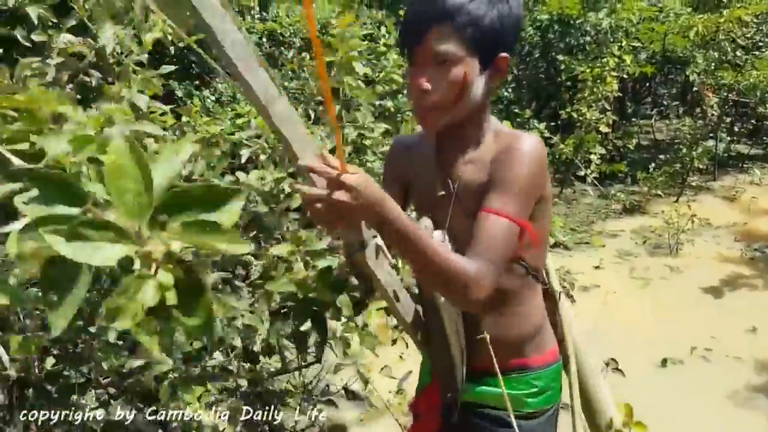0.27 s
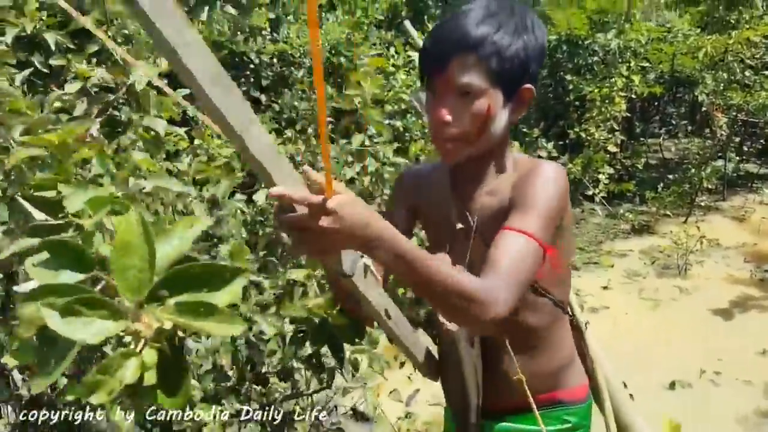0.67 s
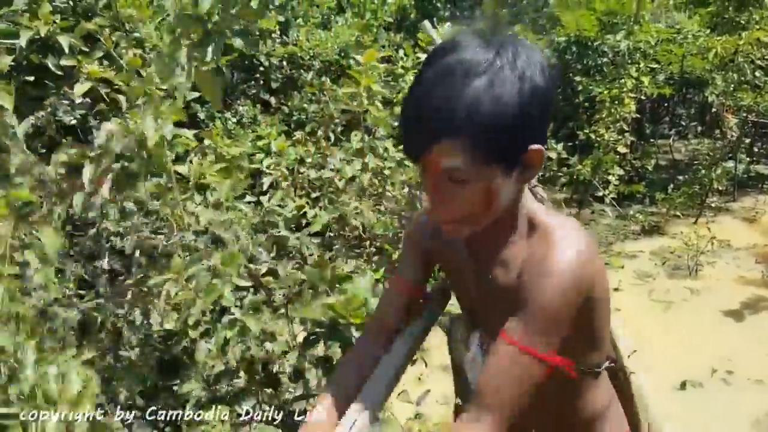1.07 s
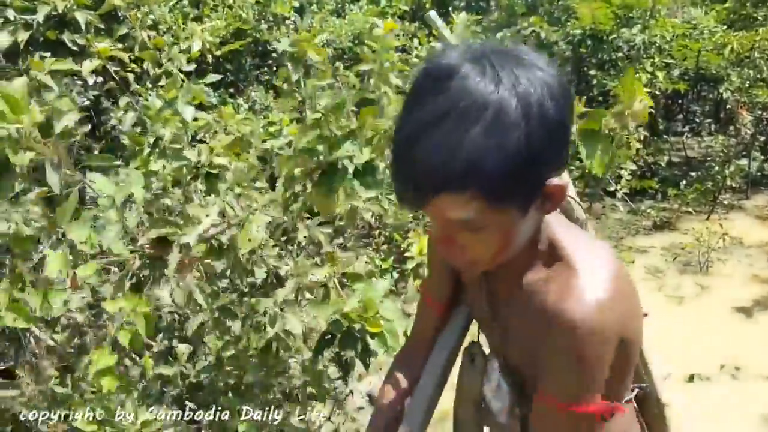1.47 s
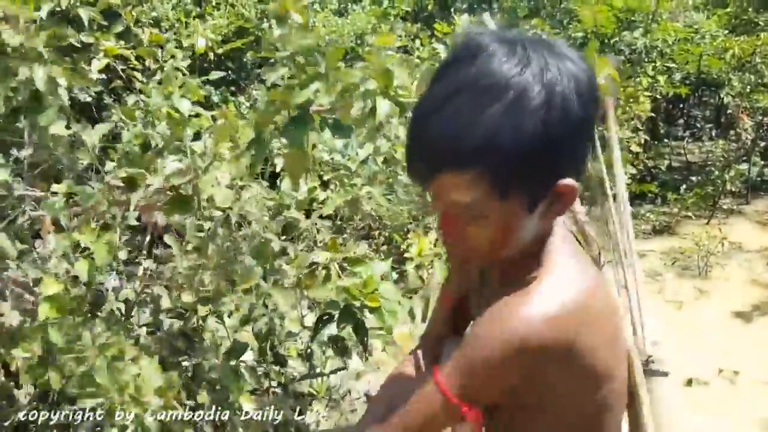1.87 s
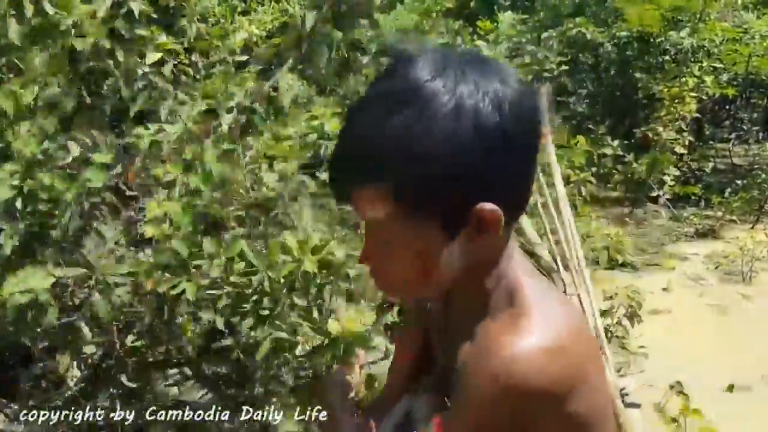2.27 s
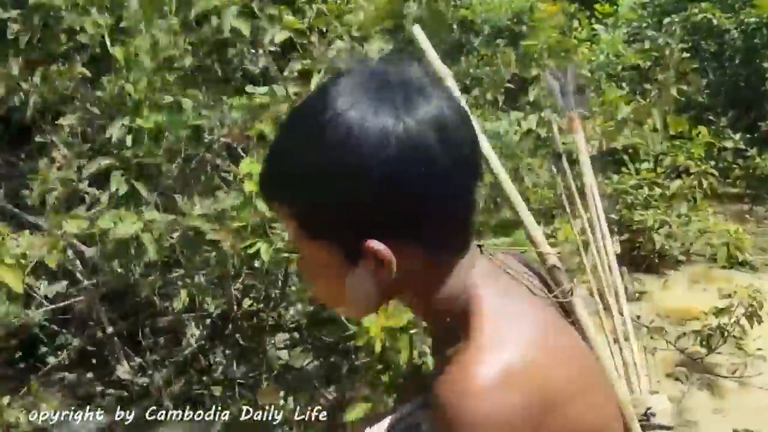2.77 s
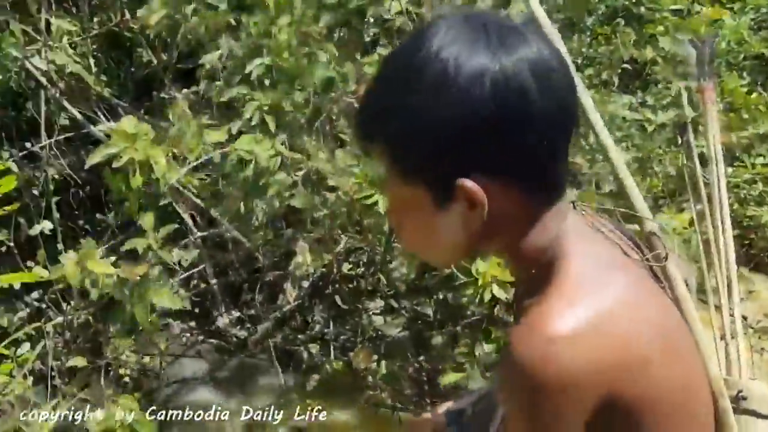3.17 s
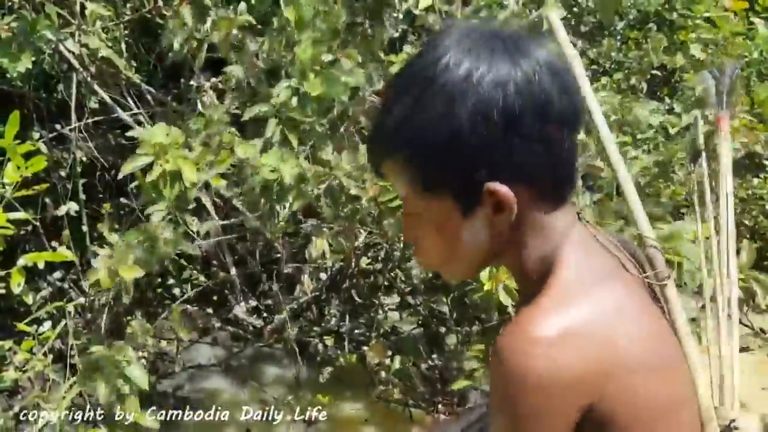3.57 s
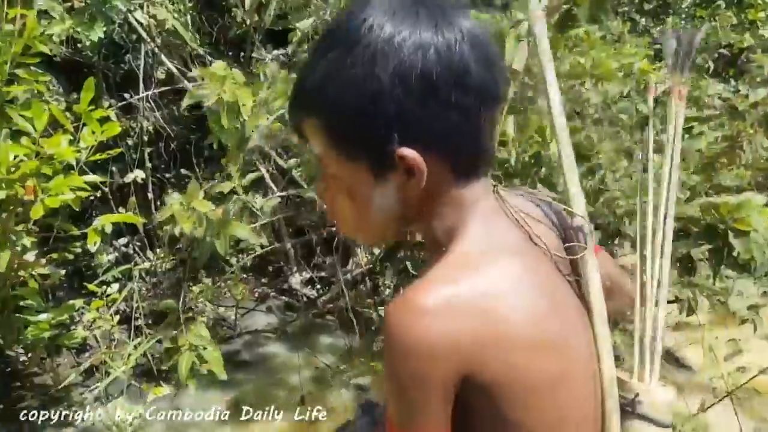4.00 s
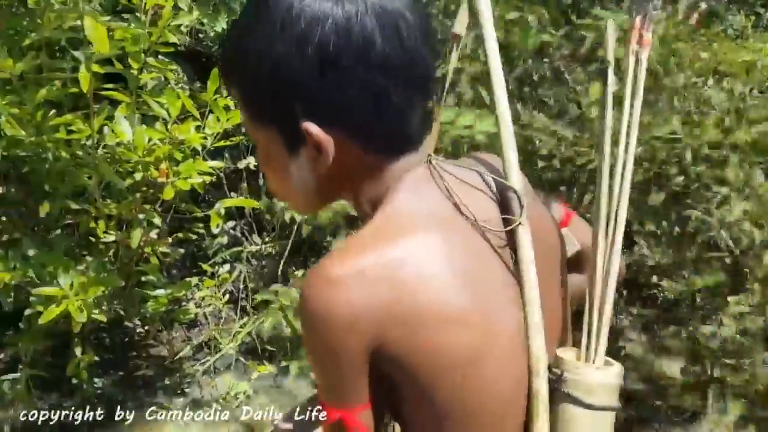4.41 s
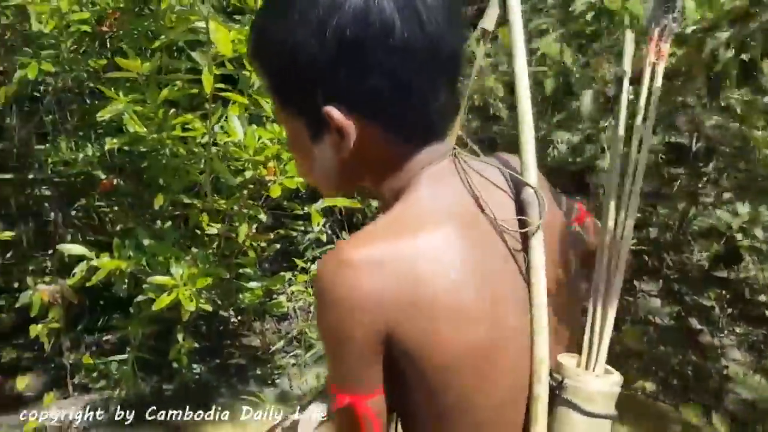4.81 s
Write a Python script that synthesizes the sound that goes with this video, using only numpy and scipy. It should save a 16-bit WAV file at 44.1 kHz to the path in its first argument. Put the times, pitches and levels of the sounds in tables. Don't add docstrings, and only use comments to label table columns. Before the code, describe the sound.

Outdoors in leafy brush, someone wades slowly through shallow muddy water. Bubbles pop and gurgle close to a stereo microphone, with sharper plops around two and four seconds. Leaves scrape, twigs tick, and a small bird repeats a fast falling song about every second, lightly echoed by trees, over quiet rumble and hiss.

```python
import sys
import numpy as np
from scipy import signal
from scipy.io import wavfile
from scipy.ndimage import uniform_filter1d

SR = 44100
rng = np.random.default_rng(int(sys.argv[2]) if len(sys.argv) > 2 else 0)


def wrap_up_sound(samples):
    columns = np.atleast_2d(samples).T
    tamed = np.clip(columns, -1, 1)
    steps = np.round(tamed * 32767).astype(np.int16)
    wavfile.write(sys.argv[1], SR, steps)


def volts(x):
    e = np.asarray(x, float) / 20
    return 10 ** e


N = 222660

# full force from t/s, hold/s, gurgle level/dB, time to swell by 10 dB/s, usual bubble f/Hz
PUSHES = [(.539, 0.026, -60, 0.12, 1215), (.654, 0.011, -54, 0.06, 1514), (.838, 0.2, -50, 0.14, 1315),
          (1.33, 0.018, -54.5, 0.22, 1467), (1.601, 0.14, -54, -0.08, 1135),
          (1.74, 0.022, -52.5, -0.04, 1610), (1.866, 0.12, -46, 0.1, 1783), (2.02, 0.16, -45.5, 0.12, 1320),
          (2.33, 0.13, -61, -0.7, 1370), (2.554, 0.0013, -50, -0.07, 1260), (2.76, 0.026, -49, -0.28, 1460),
          (3.013, 0.16, -59, 0.1, 1747), (3.2, 0.42, -60, -0.5, 1542), (3.497, 0.00083, -45, -0.0238, 1830),
          (3.65, 0.13, -53, 0.09, 1320), (3.83, 0.12, -47, 0.13, 1164), (4.1, 0.012, -57.5, 0.26, 1670),
          (4.2, 0.074, -59.5, 0.1, 1787), (4.51, .001, -58, 0.1, 1535), (4.909, 0.068, -53.5, 0.06, 1110),
          (5.03, .05, -51, 0.1, 1153)]
PUSH_EBB = 0.85


def water():
    # t/s, delay/samples
    water_lag = [
        (0, 3.3),
        (3.0, 3.2),
        (3.9, 0.067),
        (4.2, 3.3),
        (5.05, 4.7),
    ]
    near = pockets_of_air() + gurgle(spread_octaves=1.593, size_db=6.0, cycles=36.0)
    near = near + wash(226, 810, wash_db=-16.0) + wash(1790, 2500, wash_db=-10.0)
    near = near + wash(3500, 6200, wash_db=-16.5)
    lag, = in_time(water_lag)
    late = np.interp(np.arange(N) - lag, np.arange(N), near)
    return np.array([late, near]) + volts(-14) * scatter(near, t60=0.08, cut_hz=10000)


def pockets_of_air():
    # t/s,
    # peak level/dB, f/Hz, ring cycles to -60 dB
    slaps = [(.8226, -26, 1115, 8), (1.8693, -30, 615, 9.5), (2.0841, -11.5, 1930, 4.5),
             (2.1214, -23.5, 704, 7.5), (2.1676, -28, 1700, 21), (2.1925, -19.5, 760, 4.5),
             (2.5372, -11.5, 1080, 5.5), (2.5415, -28, 2130, 11), (2.5603, -23.5, 1740, 8),
             (2.7711, -20, 1390, 11), (2.7715, -25.5, 2084, 19), (2.7822, -23.5, 1600, 9),
             (2.7892, -34, 1150, 22), (2.7745, -33, 1200, 14), (2.7772, -34, 1180, 13),
             (2.7945, -39, 1200, 14), (2.838, -39, 415, 3.5), (3.9331, -21.5, 5500, 20),
             (3.9361, -28, 5230, 17), (1.9065, -25, 2510, 21), (.952, -40, 2450, 25), (.996, -40, 2300, 20),
             (1.015, -41, 2330, 20), (.922, -42, 2600, 25), (.98, -43, 2520, 20), (3.295, -44, 2250, 25),
             (3.10, -46, 3100, 25), (2.838, -44, 1500, 6), (3.0136, -28, 738, 4.5), (3.5104, -25, 1300, 12),
             (3.7192, -29.5, 1290, 11), (3.8782, -13.5, 1765, 16.5), (3.8839, -25.5, 653, 26),
             (3.9067, -31.5, 860, 15), (3.9451, -28, 774, 12), (4.246, -26.5, 1980, 31.5),
             (4.9293, -28, 794, 18), (4.9298, -26.5, 1570, 10.5), (5.0294, -26.5, 2030, 22),
             (4.9121, -27, 1110, 4), (2.1515, -32, 894, 2), (3.8795, -35, 2440, 16)]
    # t/s, peak level/dB, start f/Hz, ring cycles to -60 dB
    shooting = [(.5381, -25, 682, 18), (.5385, -35.5, 1600, 35), (.551, -49, 1010, 54.5),
                (.8736, -28, 1135, 27), (1.0548, -35, 544, 33.5), (1.5796, -28.5, 491, 15),
                (1.5833, -27.5, 634, 31), (1.6188, -34.5, 984, 38), (1.6281, -31, 1023, 16.5),
                (1.8433, -29, 2255, 41), (1.8747, -33.5, 1166, 33), (1.9061, -22, 1930, 8),
                (1.9376, -27, 1630, 24), (1.9466, -33.5, 915, 56), (2.0091, -33.5, 1190, 48),
                (2.5387, -32.5, 966, 48), (3.0205, -36, 1020, 29), (3.1503, -41, 1690, 42),
                (3.4751, -21, 1920, 16), (3.8856, -25.5, 1730, 29), (4.2524, -20.5, 920, 8.5),
                (4.9785, -40.5, 624, 48)]
    # t/s, peak level/dB, start f/Hz
    drifting = [(.5416, -28, 1037), (.7957, -37, 1810), (1.0585, -32, 1260), (1.0855, -29, 2254),
                (1.857, -36.5, 2107), (1.939, -35.5, 1170), (2.0621, -32.5, 1450), (2.1473, -37, 770),
                (3.4983, -31.5, 1820), (3.6317, -32, 1980), (3.7367, -34, 1203), (3.7873, -38, 455),
                (3.8118, -36.5, 1410), (4.0122, -36, 1120), (4.898, -33, 1417), (4.9121, -28.5, 1210),
                (1.717, -41.5, 1830), (1.747, -37.5, 2140), (1.995, -41, 1490), (2.206, -42, 1620),
                (2.225, -45.5, 1730)]
    # t/s, peak level/dB, f/Hz
    held = [(.7991, -43, 515), (.8134, -35.5, 1420), (.8537, -41, 1270), (.8663, -37.5, 1220),
            (1.0543, -31, 786), (1.9525, -32, 1132), (1.9605, -32.5, 2300), (2.0805, -25, 1295),
            (2.1512, -36, 523), (2.1824, -35, 1360), (3.5121, -28.5, 1987), (4.0847, -37, 556),
            (4.2456, -23, 1188), (4.8862, -32.5, 684), (4.8972, -45, 664), (4.9532, -39, 1856),
            (5.0175, -33, 2090), (5.0257, -38.5, 595), (2.7705, -34, 1077), (3.822, -44.5, 429),
            (2.1007, -43, 546), (1.012, -49, 585), (1.005, -46, 1002), (1.855, -44, 414)]
    # t/s, peak level/dB, start f/Hz
    drips = [(.254, -48.5, 515), (.315, -46.5, 1800), (.466, -45, 1590), (.498, -44, 1200),
             (.66, -41, 1330), (.741, -42.5, 740), (.768, -40.5, 710), (1.0553, -34.5, 1085),
             (1.193, -47, 800), (1.473, -49, 886), (1.693, -40, 1390), (1.784, -38.5, 2220),
             (2.0169, -30.5, 1210), (2.297, -51, 1070), (3.078, -39.5, 1975), (3.1575, -35, 1510),
             (3.219, -46.5, 744), (3.252, -45.5, 658), (3.297, -41, 2180), (3.333, -47, 980),
             (3.4353, -33.5, 1440), (3.5244, -27.5, 1590), (3.565, -41, 670), (4.148, -45.5, 728),
             (4.173, -44, 1650), (4.323, -52, 2450), (4.85, -36.5, 2040), (5.0042, -35, 1120),
             (.395, -57, 1750), (.42, -50, 1800), (.612, -47, 870), (.637, -39, 1510), (.776, -42, 605),
             (.922, -43, 1300), (.956, -46, 1830), (.974, -39.5, 380), (.996, -47, 575),
             (1.268, -39.5, 2240), (1.359, -41, 2160), (3.085, -46, 900), (3.104, -50, 730),
             (3.133, -46, 1390), (3.187, -45, 1220), (3.19, -46, 2230), (3.358, -46, 1280),
             (3.37, -42.5, 1790), (3.575, -45, 630), (3.62, -38.5, 1010), (3.751, -34.5, 2130),
             (3.751, -34, 1390), (3.78, -38.5, 1890), (3.929, -31.5, 2140), (3.975, -34.5, 1650),
             (3.985, -40, 1750), (4.038, -44, 2210), (4.056, -40.5, 810), (4.065, -40, 1823),
             (4.082, -39.5, 1624), (2.128, -31, 2450)]
    # t/s, peak level/dB, start f/Hz
    gulps = [(.5554, -35.5, 373), (.8783, -36, 368), (.923, -40, 346), (.957, -43.5, 365),
             (1.017, -47, 520), (1.605, -42, 497), (1.835, -39, 470), (2.534, -39, 516), (3.013, -45, 339),
             (3.5244, -35.5, 903), (3.94, -38, 528), (3.973, -41, 510), (4.243, -47, 322),
             (4.945, -44.5, 315.2), (5.023, -44, 570), (2.224, -41.5, 586), (2.263, -47, 626),
             (3.666, -46, 596), (3.685, -44, 685), (3.731, -37, 660), (3.769, -43, 695), (3.645, -47, 664),
             (3.696, -41, 750), (3.709, -45, 690), (3.867, -39, 600), (3.744, -42, 694), (3.787, -37, 1020),
             (3.839, -45, 1158), (3.719, -36, 2050), (.909, -49, 780), (.928, -46, 886), (1.962, -45, 600),
             (4.011, -42, 630)]
    pockets = kind(slaps, .077) + kind(shooting, 1.136)
    pockets += kind(drifting, 48.6, .4) + kind(held, 48.6, .097)
    pockets += kind(drips, 27, .23) + kind(gulps, 23.7, .23)
    return bubbles(pockets, length_s=.07)


def kind(rows, *shared):
    return [(*row, *shared) for row in rows]


def bubbles(rows, length_s):
    s, db, hz, cycles, rise = np.transpose(rows)[:, :, None]
    t = np.arange(int(length_s * SR)) / SR
    life = np.maximum(cycles, 4) / hz
    swell = 1 - np.exp(-1.5 * hz * t)
    tone = np.sin(2 * np.pi * hz * (t + rise * t * t / life / 2))
    return place(s[:, 0], swell * volts(db - 60 * t / life) * tone)


def gurgle(spread_octaves, size_db, cycles):
    level_db, centre_hz = efforts(PUSHES, PUSH_EBB)
    when, pitch, other, size, life, rise = rng.random((5500, 6)).T
    octaves = spread_octaves * (pitch + other - .95)
    hz = centre_hz[(when * N).astype(int)] * 2 ** octaves
    hz = np.where(hz > 2700, hz / 2, np.maximum(hz, 300))
    db = -size_db * np.log(size + .06)
    rings = bubbles(np.c_[when * N / SR, db, hz, cycles * (.3 + life), .7 * rise], length_s=.03)
    return volts(level_db - 3.5) * rms_one(rings)


def wash(low_hz, high_hz, wash_db):
    push_db, _ = efforts(PUSHES, PUSH_EBB)
    level_db = push_db + wash_db + 4.1 * drift(26)
    band = signal.butter(2, [low_hz, high_hz], "band", fs=SR, output="sos")
    return volts(level_db) * rms_one(signal.sosfilt(band, rng.standard_normal(N)))


def brush(grain_db, grains_per_s):
    # full force from t/s, hold/s, rustle level/dB, time to swell by 10 dB/s,
    # extra level below 4 kHz/dB
    strokes = [(0, 0.018, -64, 0.45, 5), (.177, .001, -62.5, 0.08, -4), (.5, .13, -76.5, -2, 8),
               (.67, 0.15, -61.5, 0.06, 8.5), (.955, .001, -54.5, 0.08, 3), (1.05, 0.34, -63, 0.32, -1),
               (1.33, 0.024, -55, 0.23, 2), (1.738, 0.0012, -52, 0.2, 7), (1.845, 0.02, -52, 0.02, 5),
               (1.93, 0.19, -48, 0.025, -12), (2.16, 0.012, -51, 0.1959, -17), (2.42, 0.19, -63, 0.1, 10),
               (2.85, 0.29, -64.5, 0.14, 8.5), (3.08, 0.0014, -51.5, -0.06, 1),
               (3.344, 0.0011, -65.5, 0.45, 3.5), (3.434, 0.0024, -52.5, -0.03, 9.5),
               (3.47, .012, -53, 0.012, 5), (3.514, .001, -50.5, 0.04, 8), (3.6, .03, -58, .04, 3),
               (3.93, .03, -57, .04, 3), (3.748, 0.24, -58.5, 0.05, 4), (4.04, 0.059, -63.5, -0.67, 16),
               (4.282, .001, -57, -0.23, 7), (4.37, 0.016, -60.5, 0.5, -4), (4.482, 0.071, -54, 0.02, -6),
               (4.82, 0.27, -70.5, -0.3, 2), (5.049, 0.00086, -52, 0.04, 8)]
    # f/Hz, level per Hz/dB
    leaf_colour = [(500, -15), (1200, -7), (2500, -5), (4700, -1), (7000, -5.5), (10000, -7), (13000, -7),
                   (15800, -7.5)]
    level_db, body_db = efforts(strokes, ebb=1)
    hits = rng.random(N) < grains_per_s / SR
    grains = hits * volts(grain_db * np.minimum(rng.exponential(1, N), 3))
    roughness = 1 + 0.35 * signal.lfilter([1], [1, -.97], grains)
    rustle = banded(rng.standard_normal((2, 2, N)) * roughness, leaf_colour, patchy_db=2.0)
    body = signal.sosfilt(signal.butter(2, 4000, fs=SR, output="sos"), rustle)
    return volts(level_db + 3.0 + 2.0 * drift(31)) * (rustle + (volts(body_db) - 1) * body)


def ticks(crack_db):
    # t/s, peak level/dB, f/Hz
    snaps = [(.6619, -43.5, 8750), (0.7344, -34, 8400), (.8225, -36, 13200), (0.9475, -35.5, 10700),
             (0.9968, -41, 5120), (1.8408, -31.5, 5130), (1.923, -32, 5650), (1.9589, -34.5, 9900),
             (2.1214, -47, 9750), (3.073, -46, 9700), (3.336, -43, 5400), (3.4321, -46, 9600),
             (3.465, -37, 8600), (3.502, -36.5, 9450), (3.789, -44.5, 9700), (3.8845, -42, 5300),
             (3.933, -37, 9050), (4.148, -48.5, 11100), (4.4726, -58, 8900), (5.014, -49, 9550),
             (5.0255, -46, 13800), (.1665, -40, 9800), (.6424, -61, 8630), (.6913, -43, 8100),
             (.7193, -51, 7700), (.7587, -45, 8600), (.883, -44, 5300), (1.044, -51, 10200),
             (1.1503, -56.5, 5600), (1.249, -34, 5060), (2.1211, -37, 5110), (2.152, -32, 4960),
             (2.7701, -49.5, 5840), (3.4321, -41.5, 5170), (3.5523, -44, 5370), (3.6062, -39.5, 5700),
             (3.6287, -50, 5270), (3.7404, -55, 5100), (4.246, -48, 5460), (4.4792, -45.5, 9300),
             (4.9631, -42.5, 5700), (5.0295, -30.5, 4800), (.9545, -51, 6000), (1.002, -40.5, 9500),
             (3.329, -57, 7000), (3.361, -49, 7450), (3.471, -36, 5800), (3.513, -45, 10300),
             (3.519, -45, 10000), (3.554, -40, 14400), (3.669, -47, 14300), (3.817, -51, 11600),
             (3.917, -46, 9400), (1.361, -41, 3200), (1.938, -43, 5450), (3.884, -41, 9560)]
    ring_s, attack_s = 0.017, 0.00062
    s, db, hz = np.transpose(snaps)[:, :, None]
    t = np.arange(1500) / SR
    flutter, crack = rng.standard_normal((2, 2, len(snaps), len(t)))
    ring = np.sin(2 * np.pi * hz * t) * rms_one(uniform_filter1d(flutter, size=24))
    fade = volts(db - 2.7 * (hz > 8000) - 60 * t / ring_s) * np.minimum(t / attack_s, 1)
    puffs = fade * (ring + volts(crack_db) * np.gradient(crack, axis=-1))
    return np.array([place(s[:, 0], side) for side in puffs])


def bird(change, buzz_hz, echo_db):
    # t from its start/s, length/s, start f/Hz, end f/Hz, level/dB
    song_notes = [(.002, 0.04, 5700, 4950, -12), (0.040, 0.03, 3960, 4100, -6),
                  (0.178, 0.034, 5040, 4100, -9.5), (0.253, 0.0081, 4850, 4670, -9),
                  (0.273, 0.0066, 4930, 4120, -6.5), (0.29, 0.015, 4100, 4060, -10.5),
                  (0.316, 0.012, 4150, 3380, -6.5), (0.359, 0.0063, 4270, 4720, 2),
                  (0.392, 0.012, 4660, 3460, -1.5), (0.405, 0.013, 4030, 3280, -7),
                  (0.446, 0.02, 3280, 3750, -10), (0.478, 0.03, 4150, 3100, -3),
                  (0.521, 0.047, 2585, 3730, -5.5), (0.558, 0.016, 4260, 3400, -9),
                  (0.573, 0.014, 2644, 3300, -6), (0.582, 0.015, 3400, 2700, -3),
                  (0.607, 0.043, 2445, 3900, -4), (0.64, 0.016, 4440, 4330, -9.5),
                  (0.654, 0.02, 4210, 2880, 0.5), (0.683, 0.023, 4120, 2920, 0.5),
                  (0.72, 0.027, 2200, 3300, -4), (0.739, 0.034, 3324, 2062, -0.5)]
    # t/s, level/dB, extra level of the opening notes/dB, left over right/dB
    sings = [
        (.071, -44.5, -2.5, -2.1),
        (1.1662, -44.5, -1.5, -.6),
        (2.259, -45.5, -10, 1.8),
        (3.563, -44, -3, 1.4),
        (4.872, -43, -3, .1),
    ]
    # t/s, length/s, start f/Hz, end f/Hz, level/dB
    chips = [(2.45, 0.024, 4870, 4480, -50.5), (2.515, .016, 4740, 4870, -55.5),
             (2.535, .02, 4890, 4400, -51), (2.615, 0.022, 4500, 4530, -49),
             (2.636, 0.033, 4800, 4330, -52.5), (2.657, 0.027, 3150, 3600, -55),
             (0.114, 0.03, 4020, 4083, -44), (1.245, 0.012, 5040, 4900, -47),
             (2.272, 0.04, 5500, 4850, -56), (2.318, 0.05, 3930, 4090, -55),
             (1.555, 0.023, 4130, 3650, -58), (1.61, .02, 3620, 3820, -55), (1.655, 0.015, 3720, 2900, -49)]
    # delay t/s, level/dB
    trunk_echoes = [
        (.017, -13),
        (.029, -15),
    ]
    opening_s = .43
    notes = list(chips)
    for start, song_db, opening_db, _ in sings:
        for at, length, hz0, hz2, db in song_notes:
            extra_db = opening_db if at < opening_s else 0
            notes.append((start + at, length, hz0, hz2, song_db + db + extra_db))

    song = np.zeros(N + SR)
    buzz = buzz_hz * rms_one(uniform_filter1d(rng.standard_normal(N + SR), size=60))
    flutter_db = 3.05 * rms_one(uniform_filter1d(rng.standard_normal(N + SR), size=150))
    for (at, length, hz0, hz2, db), luck in zip(notes, rng.standard_normal((len(notes), 2))):
        if hz2 < hz0:
            ease = 0.9
        elif length > .038:
            ease = 4.2
        else:
            ease = 1.4
        share = np.arange(int(length * SR)) / (length * SR)
        i = int(at * SR)
        here = slice(i, i + len(share))
        bend = hz2 + (hz0 - hz2) * (1 - share) ** ease
        rough = 1 if hz0 + hz2 > 8700 else .55 * min(abs(hz2 - hz0) / 600, 1)
        hz = bend * (1 + change * luck[0]) + rough * buzz[here]
        tone = np.sin(2 * np.pi * np.cumsum(hz) / SR)
        level_db = db + 1.15 * luck[1] + min(2 * rough, 1) * flutter_db[here]
        song[here] += volts(level_db) * np.sin(np.pi * share ** 0.87) ** 0.55 * tone

    song = song[:N]
    pan_db, = in_time([(row[0] + .5, row[3]) for row in sings])
    direct = np.array([song, np.roll(song, -4)])
    trunks = np.array([volts(db) * np.roll(song, int(late * SR)) for late, db in trunk_echoes])
    leaves = volts(echo_db) * scatter(song, t60=0.1, cut_hz=9500)
    heard = volts(0.5) * direct + trunks + .5 * trunks[::-1] + leaves
    return volts(np.outer([.5, -.5], pan_db)) * heard


def open_air():
    # f/Hz, level per Hz/dB
    air_colour = [(22, -38), (36, 3), (70, 0.5), (165, -1.5), (420, -12.5), (1000, -16.5), (2000, -18),
                  (2800, -19), (4100, -20.5), (6600, -28), (9500, -23), (12600, -26.5), (15700, -34)]
    return volts(-60.5) * banded(rng.standard_normal((2, 2, N)), air_colour, patchy_db=3.5)


def efforts(rows, ebb):
    s, hold, db, swell, colour = np.transpose(rows)[:, :, None]
    t = np.arange(0, N + 64, 64) / SR
    swell = np.maximum(swell, .005)
    away = np.maximum(np.maximum(s - t, (t - s - hold) / ebb), 0)
    power = volts(2 * db - 20 * away / swell) + 1e-12
    total = power.sum(axis=0)
    return in_time(np.c_[t, 10 * np.log10(total), (power * colour).sum(axis=0) / total])


def banded(source, spectrum, patchy_db):
    # f/Hz, likeness from -1 to 1
    likeness = [(30, .93), (80, .82), (300, 0.73), (800, 0.48), (1500, -0.1), (3000, -0.05), (5000, 0),
                (15000, -0.03)]
    out = 0
    edges = 28 * 2 ** np.arange(0, 9.6, .5)
    for k, (low, high) in enumerate(zip(edges, edges[1:])):
        band = signal.butter(2, [low, high], "band", fs=SR, output="sos")
        mid, side = signal.sosfilt(band, source[k % 2])
        hz = np.sqrt(low * high)
        alike = np.clip(at_hz(likeness, hz), -.99, .99)
        gain = volts(at_hz(spectrum, hz) + patchy_db * drift(16.0))
        out = out + gain * (np.sqrt(1 + alike) * mid + np.sqrt(1 - alike) * side * [[1], [-1]])
    return rms_one(out)


def scatter(x, t60, cut_hz):
    t = np.arange(int(.25 * SR)) / SR
    tail = rng.standard_normal((2, len(t))) * volts(-60 * t / t60) * (t > .002)
    tail = signal.sosfilt(signal.butter(1, cut_hz, fs=SR, output="sos"), tail)
    return signal.fftconvolve(x[None], tail / np.linalg.norm(tail[0]), axes=1)[:, :N]


def place(seconds, sounds):
    at = (np.asarray(seconds) * SR).astype(int)[:, None] + np.arange(sounds.shape[1])
    return np.bincount(at.ravel(), sounds.ravel(), N + SR)[:N]


def drift(rate):
    r = np.exp(-80 * np.pi * rate / SR)
    slow = signal.lfilter([1], [1, -2 * r, r * r], rng.standard_normal(N // 40 + 2002))[2000:]
    return np.interp(np.arange(N) / 40, np.arange(len(slow)), rms_one(slow))


def in_time(rows):
    s, *columns = np.transpose(rows)
    return [np.interp(np.arange(N) / SR, s, c) for c in columns]


def at_hz(points, hz):
    point_hz, value = np.array(points).T
    return np.interp(np.log(hz), np.log(point_hz), value)


def rms_one(x):
    return x / np.sqrt(np.mean(x ** 2) + 1e-20)


def scene():
    leaves = brush(grain_db=0.0, grains_per_s=220.0) + ticks(crack_db=-12)
    song = bird(change=0.0114, buzz_hz=179.0, echo_db=-4.0)
    return water() + leaves + song + open_air()


def band_limit(x):
    return signal.sosfilt(signal.butter(12, 15830, fs=SR, output="sos"), x)


def record(dry):
    port_hz, port_width_hz, port_lift = 9700, 1840, 0.48
    heard = signal.sosfilt(signal.butter(3, 38, "high", fs=SR, output="sos"), dry) - .0005
    port = signal.iirpeak(port_hz, port_hz / port_width_hz, fs=SR)
    heard = heard + port_lift * signal.lfilter(*port, heard)
    heard = signal.sosfilt(signal.cheby2(24, 60, 16000, fs=SR, output="sos"), heard)
    return band_limit(heard)


dry = scene()
out = record(dry)
wrap_up_sound(out)
```